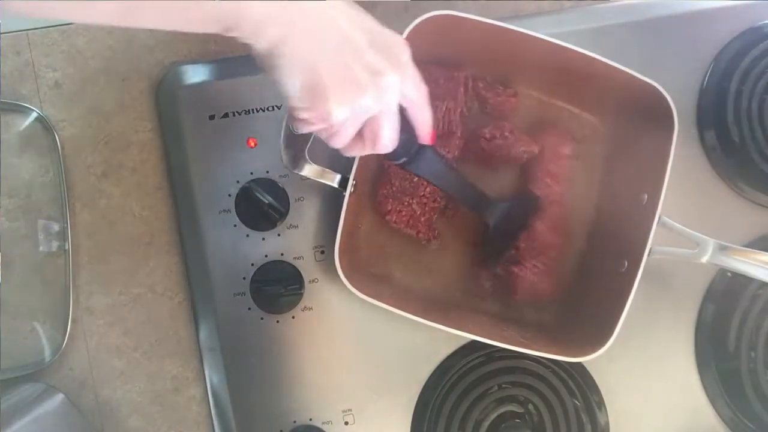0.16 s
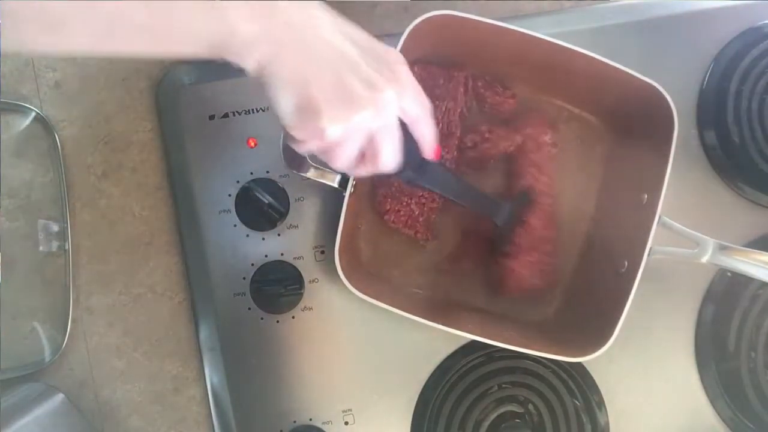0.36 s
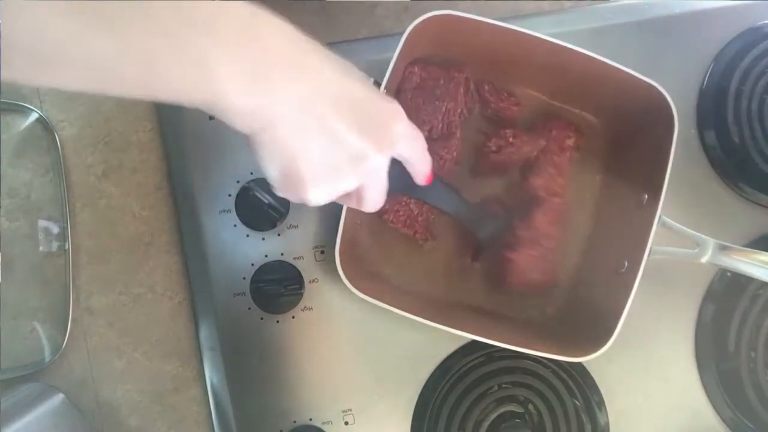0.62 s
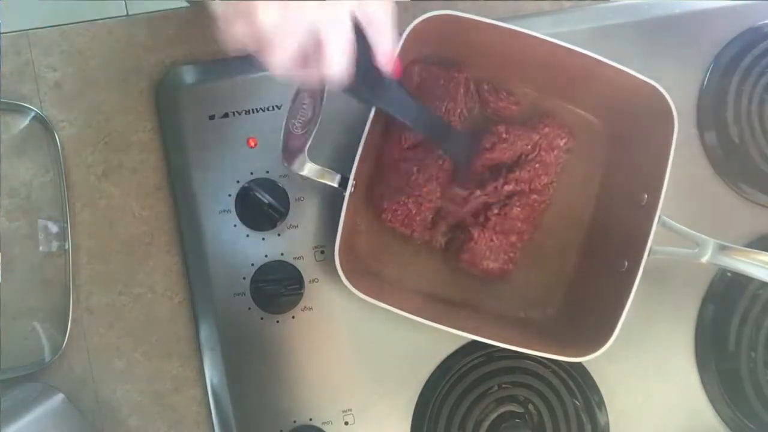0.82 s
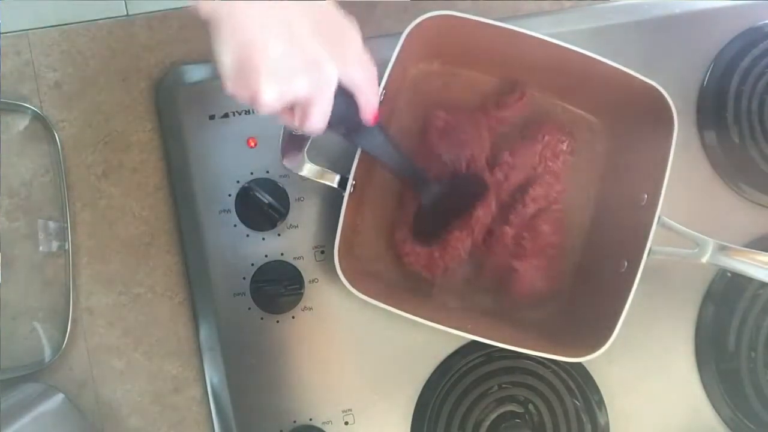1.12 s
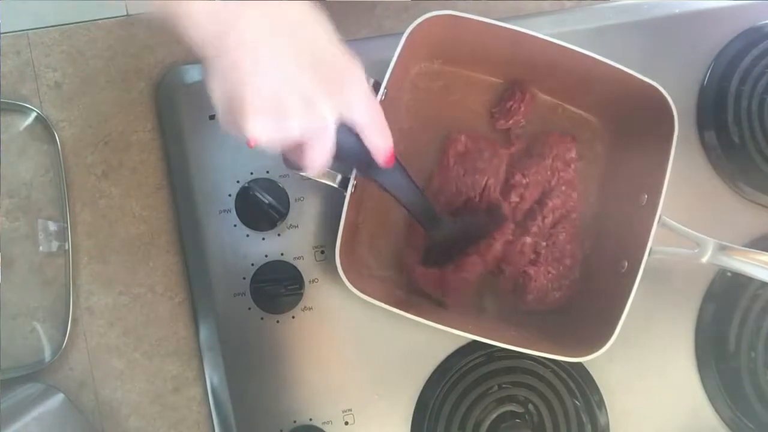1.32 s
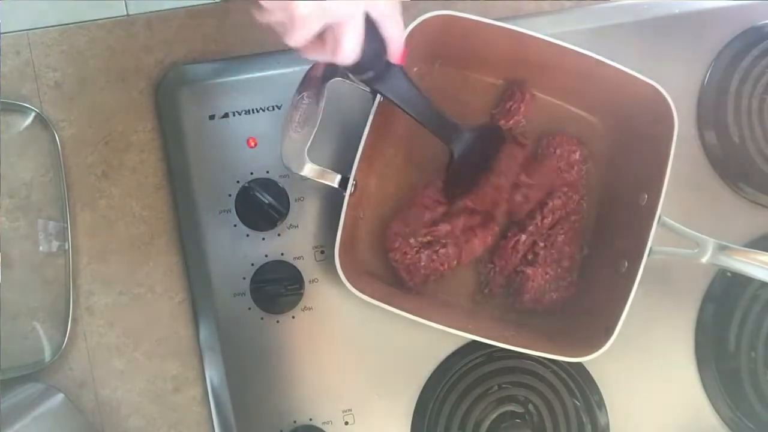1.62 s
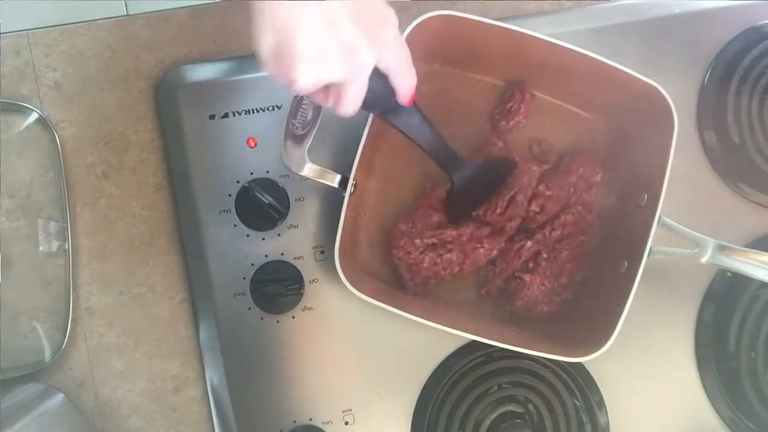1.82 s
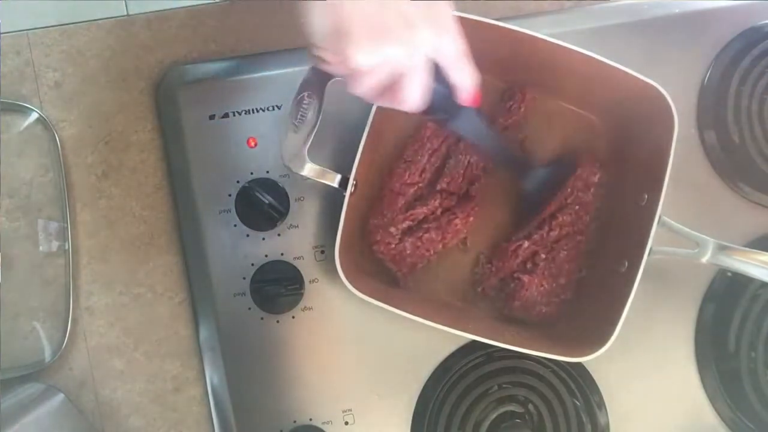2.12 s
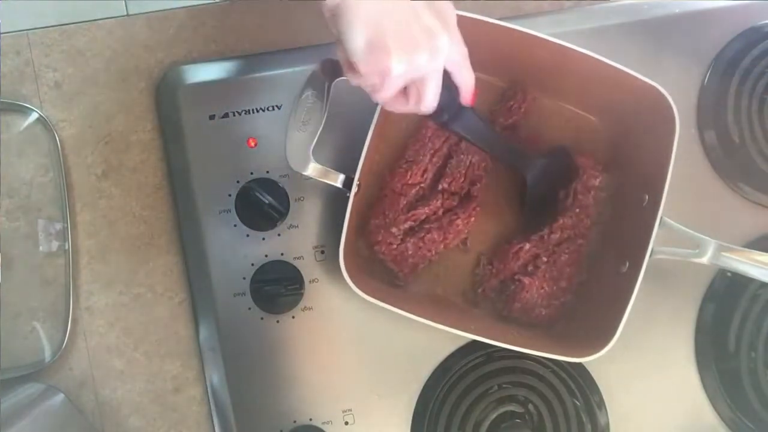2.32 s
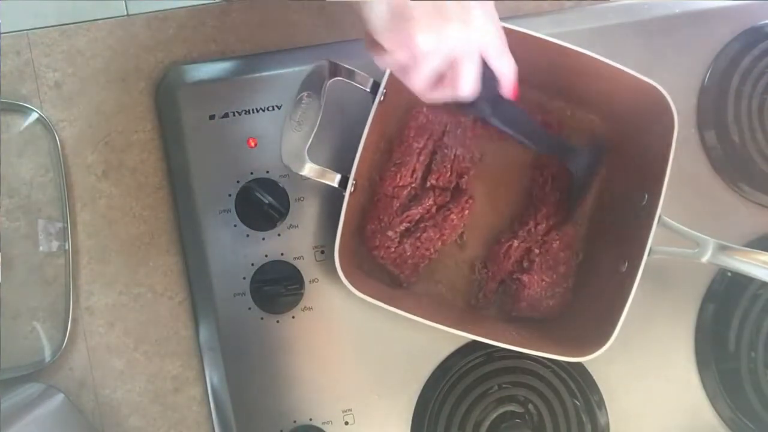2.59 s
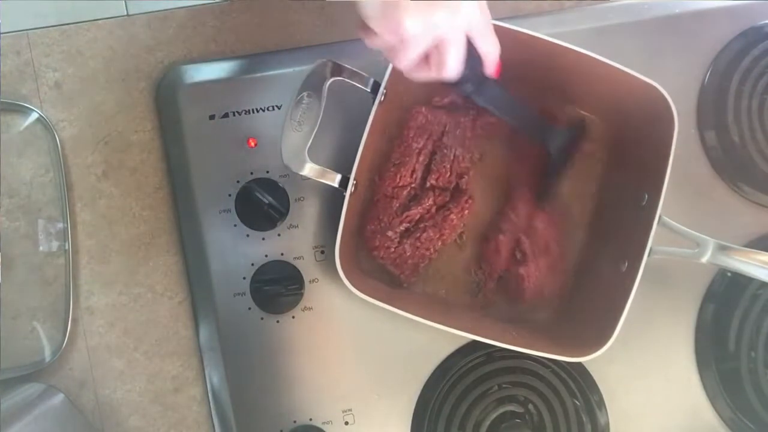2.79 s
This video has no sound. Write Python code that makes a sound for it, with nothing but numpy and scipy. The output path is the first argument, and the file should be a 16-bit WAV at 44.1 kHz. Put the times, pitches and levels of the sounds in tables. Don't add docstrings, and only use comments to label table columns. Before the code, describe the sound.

Steady bright frying of meat in a pan, crackling and spitting with fat, close up

```python
import sys
import numpy as np
from scipy import signal
from scipy.fft import rfft, irfft
from scipy.io import wavfile
from scipy.ndimage import uniform_filter1d

SR = 44100
rng = np.random.default_rng(int(sys.argv[2]) if len(sys.argv) > 2 else 0)


def int16_out(signal):
    q = np.round(np.clip(np.atleast_2d(signal).T, -1, 1) * 32767)
    wavfile.write(sys.argv[1], SR, q.astype(np.int16))


N = 130095

# t/s, level/dB
FRYING_LEVEL = [(0.0, -24), (0.02, -22), (0.12, -22), (0.19, -21.5), (0.27, -22.5), (0.58, -21.5),
                (0.6, -22.5), (0.63, -23.5), (0.65, -22.5), (0.94, -22.5), (0.97, -23), (1.12, -22),
                (1.53, -22.5), (1.61, -22.5), (1.62, -24), (1.64, -22), (1.77, -22.5), (2.95, -22.5)]
# f/Hz, level/dB
SIZZLE_COLOUR = [
    (240, -50),
    (400, -44.5),
    (511, -22),
    (615, -26),
    (1040, -10),
    (2100, -5),
    (2810, 0.5),
    (6640, -9.5),
    (15700, -17),
]
# f/Hz, width/Hz, level/dB
PAN_WALLS = [
    (3060, 640, 1),
    (4350, 600, 4.5),
    (4805, 190, -3.5),
    (5460, 440, 3.5),
    (6700, 470, 1.5),
    (6590, 1110, 3.5),
    (7450, 340, -2),
    (10450, 430, -4.5),
]
# f/Hz, width/Hz, level/dB
STANDING_WAVES = [(55, 3.7, 6), (141, 6.4, -8), (185, 7.5, 3.5), (252, 3, -6), (360, 5.7, 7), (514, 32, 5),
                  (695, 16, 6.5), (767, 22, -1), (779, 27, 7.5), (827, 16, -4), (846, 10, 4), (1074, 11, 8),
                  (1066, 5.8, -13.5), (1427, 10, -11)]
# f/Hz, level/dB
RUMBLE_COLOUR = [
    (21, -31),
    (36, -6),
    (70, -7.5),
    (183, -15),
    (232, -16),
    (507, -15),
    (618, -11),
    (700, -7),
    (1540, -120),
]
# f/Hz, level/dB
MOTOR_TONES = [
    (42, -61.5),
    (57.5, -58),
]
# start t/s, length t/s, level/dB, f/Hz
SPATULA_STROKES = [
    (0, 0.12, -57.5, 325),
    (0.61, 0.15, -66, 260),
    (0.96, 0.33, -56.5, 318.6),
    (2.41, 0.43, -56, 177.9),
    (2.485, 0.13, -50.5, 260),
    (2.637, 0.13, -54, 289.5),
    (2.687, 0.072, -54, 324),
]
# t/s, peak level/dB, f/Hz
FAT_SPRAYS = [(0.0912, -25, 8610), (0.2698, -19, 11800), (0.613, -20, 12800), (0.7672, -22, 8520),
              (0.9018, -17, 12400), (1.0176, -18, 13300), (1.1054, -20, 8510), (1.3583, -17, 9190),
              (1.9026, -21, 14300), (2.4334, -20, 8860), (2.4892, -22, 8930), (2.4987, -20, 9540)]
# t/s, peak level/dB
DROPLET_TICKS = [(0.1178, -18.6), (0.1504, -20.2), (0.2443, -18.9), (0.271, -14.7), (0.2993, -20.0),
                 (0.3154, -18.8), (0.3558, -18.4), (0.4023, -16.6), (0.444, -18.4), (0.5876, -20.0),
                 (0.6144, -16.0), (0.6334, -19.6), (0.642, -18.5), (0.7157, -18.8), (0.769, -17.3),
                 (0.8023, -18.3), (0.9033, -13.4), (1.0189, -15.0), (1.0292, -17.0), (1.0499, -19.0),
                 (1.1071, -15.2), (1.2114, -19.9), (1.3597, -13.0), (1.4239, -19.2), (1.7908, -20.2),
                 (1.9037, -17.1), (1.9709, -17.8), (2.0126, -18.3), (2.0234, -19.0), (2.0307, -19.8),
                 (2.0631, -17.2), (2.0901, -19.1), (2.3482, -19.6), (2.4133, -19.4), (2.4347, -17.4),
                 (2.4765, -18.3), (2.4904, -18.8), (2.5, -14.8), (2.5082, -18.6), (2.5956, -19.9),
                 (2.6547, -17.0), (2.6695, -17.6), (2.6823, -19.5), (2.8801, -19.4)]
# t/s, peak level/dB, f/Hz
RINGING_BUBBLES = [(0.1295, -17.3, 5430.0), (0.1361, -14.4, 4350.0), (0.152, -17.6, 5170.0),
                   (0.1691, -15.9, 2070.0), (0.172, -12.6, 4440.0), (0.1792, -16.7, 1770.0),
                   (0.1879, -14.3, 2280.0), (0.1941, -15.9, 5680.0), (0.2061, -15.3, 4350.0),
                   (0.2148, -12.7, 2450.0), (0.3131, -13.1, 3100.0), (0.3505, -14.7, 2890.0),
                   (0.3661, -15.4, 3960.0), (0.4811, -14.5, 3700.0), (0.5297, -11.9, 3140.0),
                   (0.5529, -12.6, 2710.0), (0.6219, -12.7, 2970.0), (0.6309, -10.9, 3060.0),
                   (0.6327, -14.8, 4390.0), (0.6375, -12.6, 2410.0), (0.7263, -17.1, 2280.0),
                   (0.7474, -14.4, 2710.0), (0.8196, -13.2, 2840.0), (0.8584, -13.3, 3700.0),
                   (0.8874, -16.6, 2200.0), (0.9223, -13.4, 3530.0), (1.1251, -14.9, 3660.0),
                   (1.1276, -14.8, 2840.0), (1.2354, -13.6, 2890.0), (1.272, -14.7, 2760.0),
                   (1.3014, -16.7, 5640.0), (1.366, -10.4, 2710.0), (1.5702, -14.5, 2630.0),
                   (1.6366, -15.7, 1980.0), (1.6646, -14.9, 2890.0), (1.7288, -17.5, 2200.0),
                   (1.9654, -14.5, 2670.0), (2.1083, -15.2, 3400.0), (2.1696, -15.0, 2670.0),
                   (2.2396, -17.1, 2330.0), (2.3256, -14.4, 2930.0), (2.3927, -14.4, 3400.0),
                   (2.441, -19.8, 1380.0), (2.5295, -15.0, 3190.0), (2.5629, -15.5, 4050.0),
                   (2.6768, -15.6, 4260.0), (2.7211, -14.8, 2970.0), (2.7722, -15.4, 4220.0)]
# t/s, peak level/dB, f/Hz
WET_POPS = [(0.167, -28, 1800), (0.355, -23, 1430), (1.117, -30, 1990), (1.966, -16, 1790),
            (2.028, -34, 1880), (2.08, -24.5, 1500), (2.308, -17, 1530), (2.41, -31, 1230),
            (2.413, -17, 1650), (2.438, -24, 1310), (2.8, -18, 1560), (2.838, -31, 1640)]
# t/s, peak level/dB, f/Hz
FAT_SPITS = [(0.168, -7, 4350), (0.2128, -26, 2530), (0.3117, -38, 3140), (0.3572, -5.5, 2900),
             (0.4462, -7, 3280), (0.5273, -13, 3120), (0.618, -4.5, 3080), (0.856, -8, 2920),
             (1.1178, -7, 2920), (1.223, -6, 2500), (1.2335, -8, 2760), (1.364, -7, 2690),
             (1.428, -18, 4200), (1.5678, -8.5, 2920), (1.6007, -6, 3100), (1.6328, -11.5, 2160),
             (1.646, -10, 3270), (1.695, -6, 2900), (1.721, -10, 2740), (1.9654, -17, 2970),
             (2.0845, -6.5, 3300), (2.4136, -13, 2700), (2.439, -10, 2980), (2.497, -12, 4400)]
# t/s, peak level/dB, f/Hz
BUBBLE_SNAPS = [(0.1687, -11.9, 1920.0), (0.1714, -11.7, 4460.0), (0.2147, -11.1, 2690.0),
                (0.2197, -11.3, 2930.0), (0.2337, -11.9, 2990.0), (0.2516, -9.2, 4460.0),
                (0.3137, -11.9, 2990.0), (0.6213, -9.4, 2970.0), (0.6315, -10.9, 3080.0),
                (0.6371, -11.1, 2650.0), (0.8566, -11.6, 3170.0), (0.8593, -11.7, 3100.0),
                (0.8965, -11.2, 2950.0), (0.9223, -12.5, 3380.0), (1.0109, -12.3, 2780.0),
                (1.1194, -10.1, 2540.0), (1.2073, -10.6, 4030.0), (1.325, -12.3, 2860.0),
                (1.4302, -11.2, 2730.0), (1.6627, -9.4, 3680.0), (1.7208, -12.4, 2560.0),
                (1.9386, -12.9, 2760.0), (1.9709, -9.5, 3080.0), (2.2182, -13.1, 3490.0),
                (2.3088, -6.9, 4130.0), (2.4406, -10.8, 2890.0), (2.5001, -10.4, 2950.0),
                (2.5305, -12.4, 2990.0), (2.5628, -12.2, 3600.0), (2.8409, -11.9, 2800.0)]
# t/s, peak level/dB, f/Hz
SPATULA_KNOCKS = [(.355, -32.5, 566), (.645, -40, 240), (.785, -36.5, 510), (1.115, -49, 640),
                  (1.12, -39, 300), (1.36, -38, 290), (1.735, -40, 517), (2.026, -38.5, 480),
                  (2.306, -42, 596), (2.668, -36, 516), (2.8, -40, 560), (2.938, -37, 720)]
# t/s, peak level/dB, f/Hz
DEEP_PLOPS = [(0.9229, -24, 1220), (1.12, -26, 920), (1.3572, -23, 1010), (1.4256, -26, 1040),
              (2.0301, -24.5, 1040), (2.1769, -25, 1150), (2.3096, -24, 1050), (2.4147, -25, 1160.0),
              (2.4407, -29, 1210), (2.4892, -28, 1100.0), (2.6703, -27, 1160), (2.941, -26, 1030)]

PAN_WET_DB, PAN_T60_S = -2.5, 0.14
BUBBLES_PER_S, SIZE_SPREAD_DB = 5000, 2.6
CYCLES_FEW, CYCLES_MANY = 2.2, 16
CLUMP_S, CLUMP_DB = 0.011, 0.4
HISS_DB, FLICKER_DB, SHARED_DB = -0.5, 0.48, -0.18
PATCH_DB, BLOB_DB = 0.5, 0.8
FLARE_DB, FLARE_S = 0, 0.016


def undb(db):
    return 10 ** (np.asarray(db) / 20)


def evened(x):
    return x / np.sqrt(np.mean(x ** 2) + 1e-20)


def read(points, hz):
    f, value = np.transpose(points)
    return np.interp(np.log(hz + 1), np.log(f + 1), value)


def lifts(table, hz):
    return sum(lift * np.exp(-((hz - f) / width) ** 2) for f, width, lift in table)


def coloured(x, gain):
    return irfft(rfft(x) * gain, len(x))


def high_pass(x, order, cutoff_hz):
    return signal.sosfilt(signal.butter(order, cutoff_hz, "high", fs=SR, output="sos"), x)


def burst(hz, cycles, glide, size=2048):
    u = np.arange(size) / SR * hz / cycles
    envelope = (1 - np.exp(-u * 12)) * np.exp(-2.5 * u)
    return envelope * np.sin(2 * np.pi * cycles * (u + glide * u ** 2))


def pan(x, flatten=0):
    t = np.arange(4096) / SR
    tail = rng.standard_normal(len(t)) * undb(-60 * t / PAN_T60_S)
    tail *= np.minimum(t / 0.0025, 1)
    path = 1 + undb(PAN_WET_DB) * rfft(tail / np.linalg.norm(tail), N)
    return coloured(x, path / (abs(path) + 0.1) ** flatten)


def patchy(x, size, bins, frames, depth_db):
    overlap = size * 3 // 4
    z = signal.stft(x, nperseg=size, noverlap=overlap)[2]
    field = rng.standard_normal(z.shape[::-1]).T
    field = uniform_filter1d(field, size=bins, axis=0)
    field = evened(uniform_filter1d(field, size=frames, axis=1))
    return signal.istft(z * undb(depth_db * field), nperseg=size, noverlap=overlap)[1][:N]


def flares():
    kicks = np.zeros(N)
    for s, db, hz in [*FAT_SPITS, *RINGING_BUBBLES]:
        kicks[round(s * SR)] = undb(db + 18)
    return np.tanh(signal.oaconvolve(kicks, np.hanning(round(FLARE_S * SR)), "same"))


def small_bubbles(clump):
    size = undb(SIZE_SPREAD_DB * np.minimum(rng.exponential(1, N), 5) + CLUMP_DB * clump)
    bursting = rng.random(N) < BUBBLES_PER_S / SR
    hits = -size * bursting
    pitches = np.geomspace(500, 16000, num=48)
    kind = rng.integers(0, len(pitches), N)
    spectrum, power = 0, 0
    for k, hz in enumerate(pitches):
        cycles = CYCLES_FEW + (CYCLES_MANY - CYCLES_FEW) * (k % 3) / 2
        ring = burst(hz, cycles, 0.071)
        ring = rfft(ring / np.linalg.norm(ring), N)
        spectrum = spectrum + ring * rfft(hits * (kind == k))
        power = power + abs(ring) ** 2
    return evened(irfft(spectrum / np.sqrt(power + 1e-9), N))


def sizzle():
    clump = uniform_filter1d(rng.standard_normal(N), round(CLUMP_S * SR))
    clump = evened(uniform_filter1d(clump, 100))
    bubbles = pan(small_bubbles(clump), flatten=0.44)
    hiss = undb(HISS_DB + FLICKER_DB * clump) * rng.standard_normal(N)
    frying = patchy(bubbles + hiss, size=512, bins=8, frames=12, depth_db=PATCH_DB)
    frying = patchy(frying, size=128, bins=3, frames=10, depth_db=BLOB_DB)

    hz = np.fft.rfftfreq(N, 1 / SR)
    colour_db = read(SIZZLE_COLOUR, hz) + lifts(PAN_WALLS, hz)
    colour_db -= 12 * np.maximum(np.log2(450 / (hz + 1)), 0)
    s, level_db = np.transpose(FRYING_LEVEL)
    heat_db = np.interp(np.arange(N) / SR, s, level_db) - 1.01
    heat_db += FLARE_DB * flares() + SHARED_DB * clump
    return evened(coloured(frying, undb(colour_db))) * undb(heat_db)


def kitchen():
    hz = np.fft.rfftfreq(N, 1 / SR)
    db = read(RUMBLE_COLOUR, hz)
    db -= 14 * np.maximum(np.log2((hz + 1) / 500), 0)
    db -= 36 * np.maximum(np.log2(37 / (hz + 1)), 0)
    return undb(-52) * evened(coloured(rng.standard_normal(N), undb(db)))


def motors():
    t = np.arange(N) / SR
    return sum(undb(db) * np.sin(2 * np.pi * (hz * t + rng.random())) for hz, db in MOTOR_TONES)


def strokes():
    t, out = np.arange(N) / SR, np.zeros(N)
    for start, length, db, hz in SPATULA_STROKES:
        a, b, c = rng.standard_normal((3, N))
        turn = 2 * np.pi * hz * t
        sway = signal.lfilter([1], [1, -0.9985], [a, b])
        tone = evened(sway[0] * np.cos(turn) + sway[1] * np.sin(turn))
        dull = evened(signal.lfilter(*signal.butter(2, [140, 420], "band", fs=SR), c))
        swell = np.sin(np.pi * np.clip((t - start) / length, 0, 1)) ** 0.32
        out += undb(db) * swell * (tone + undb(-1) * dull)
    return out


def spatter(table, cycles, trim_db, tail_db, tail_s, late_s):
    out = np.zeros(N + 4096)
    t = np.arange(2048) / SR
    puffs = rng.standard_normal((len(table), 2048))
    for (s, db, hz), puff in zip(table, puffs):
        click = burst(hz, cycles, 0.013)
        ring = evened(signal.fftconvolve(puff, burst(hz, 2 * cycles, 0))[:2048])
        ring *= undb(tail_db) * np.exp(-t / tail_s) * np.minimum(t / 0.00035, 1)
        at = round((s + late_s) * SR)
        out[at:at + 2048] += undb(db + trim_db) * (click / abs(click).max() + ring)
    return out[:N]


def sprays():
    return spatter(FAT_SPRAYS, 4, trim_db=-2.5, tail_db=-15, tail_s=0.0045, late_s=0.0004)


def ticks():
    s, db = np.transpose(DROPLET_TICKS)
    out = np.zeros(N)
    out[np.round(s * SR).astype(int)] = -undb(db + 10)
    return pan(high_pass(out, 2, 7000))


def chirps():
    return spatter(RINGING_BUBBLES, 12.5, trim_db=-6, tail_db=-10, tail_s=0.0065, late_s=-0.00167)


def pops():
    return spatter(WET_POPS, 4, trim_db=-2.5, tail_db=-12, tail_s=0.009, late_s=0.00093)


def spits():
    return spatter(FAT_SPITS, 3.5, trim_db=-6.5, tail_db=-7, tail_s=0.005, late_s=0.0006)


def snaps():
    out, t = np.zeros(N + 256), (np.arange(256) - 64) / SR
    for s, db, hz in BUBBLE_SNAPS:
        u = t * hz
        envelope = np.exp(-(u / np.where(u < 0, 0.55, 0.9)) ** 2)
        at = round(s * SR) - 64
        out[at:at + 256] -= undb(db + 1) * envelope * np.cos(2 * np.pi * (u + 0.07))
    return pan(out[:N])


def knocks():
    return spatter(SPATULA_KNOCKS, 1.8, trim_db=0, tail_db=-12.5, tail_s=0.02, late_s=0)


def plops():
    return spatter(DEEP_PLOPS, 2, trim_db=-1.8, tail_db=-7, tail_s=0.01, late_s=-0.00073)


def scene():
    hz = np.fft.rfftfreq(N, 1 / SR)
    fat = high_pass(spits() + pops() + sprays() + plops() + snaps(), 3, 420)
    steady = coloured(sizzle() + kitchen(), undb(lifts(STANDING_WAVES, hz)))
    spatula = strokes() + knocks()
    left = undb(3.5) * (steady + spatula + fat + ticks() + motors() + chirps())
    return np.array([left, np.zeros(N)])


def record(dry):
    edge = signal.firwin(1023, 15735, window=("kaiser", 9), fs=SR)
    return signal.oaconvolve(dry, edge[None], "same")


dry = scene()
out = record(dry)
int16_out(out)
```